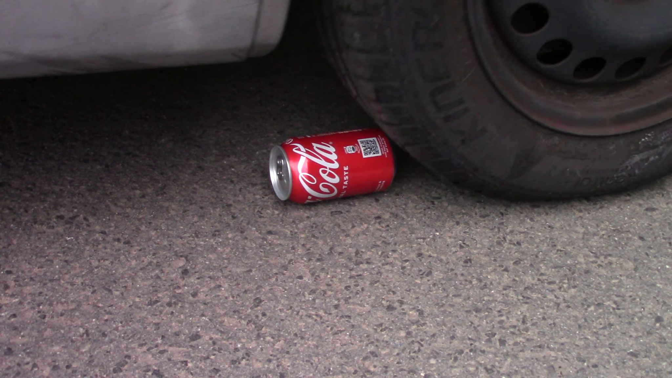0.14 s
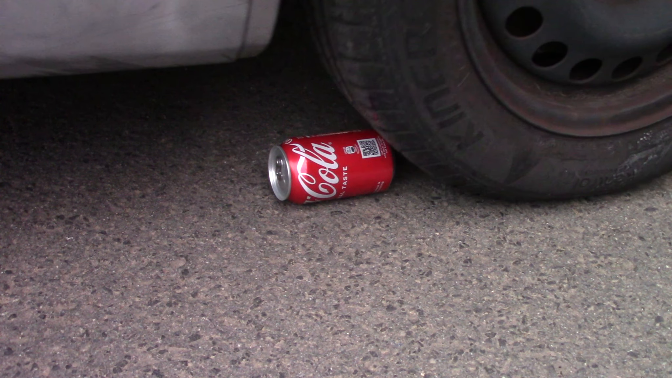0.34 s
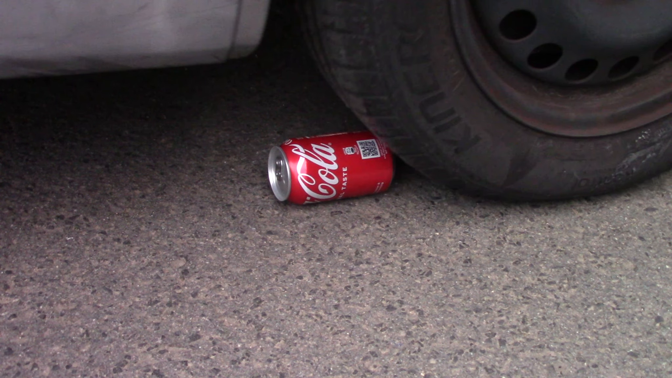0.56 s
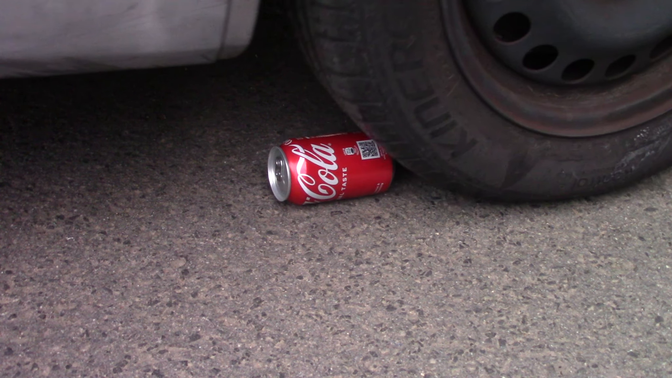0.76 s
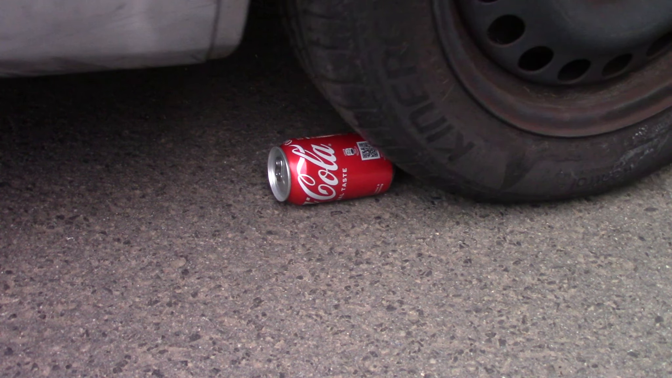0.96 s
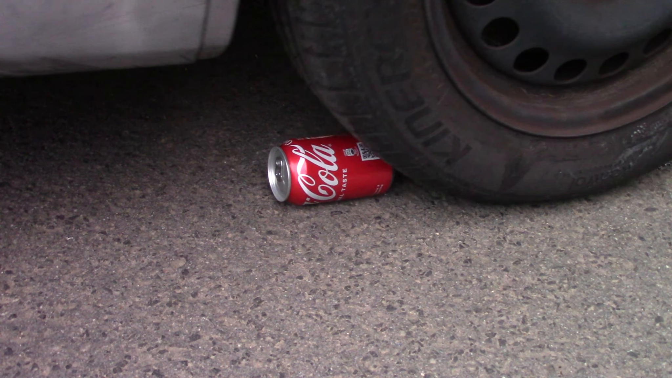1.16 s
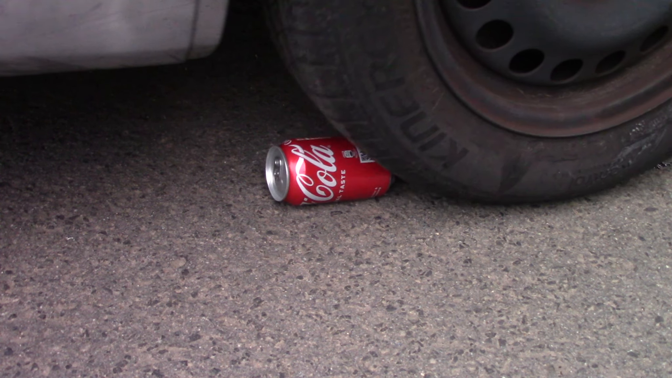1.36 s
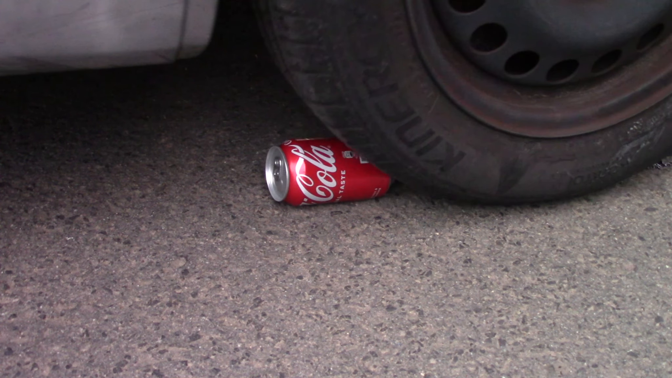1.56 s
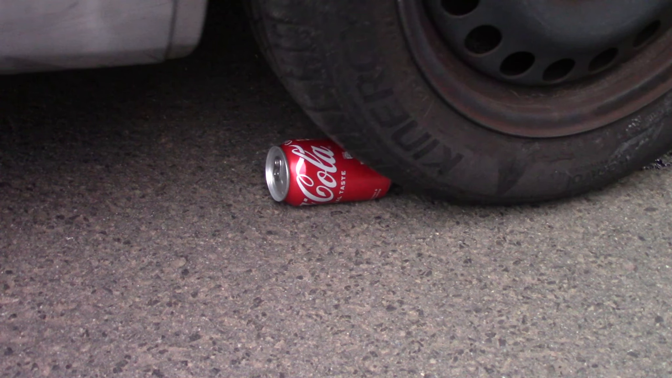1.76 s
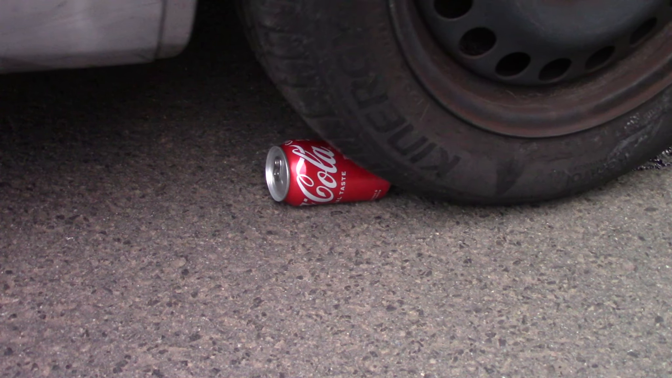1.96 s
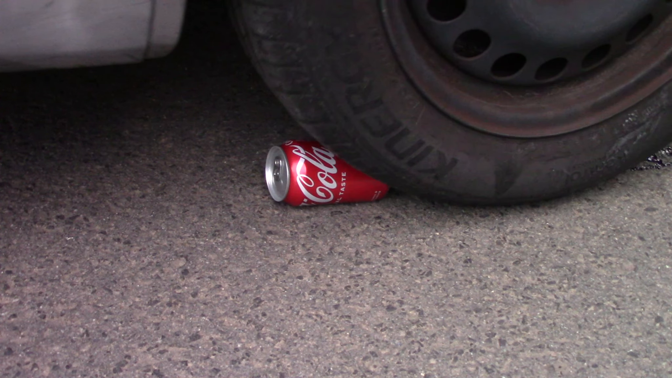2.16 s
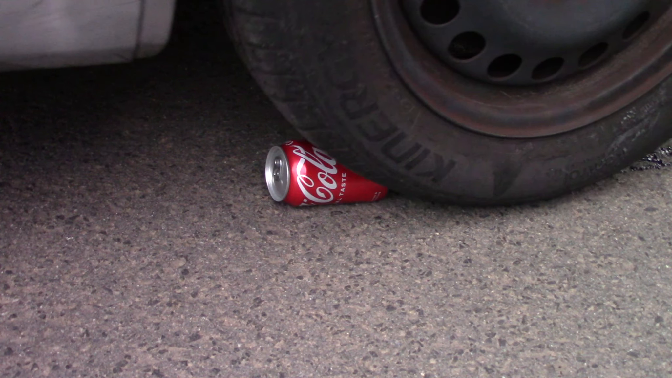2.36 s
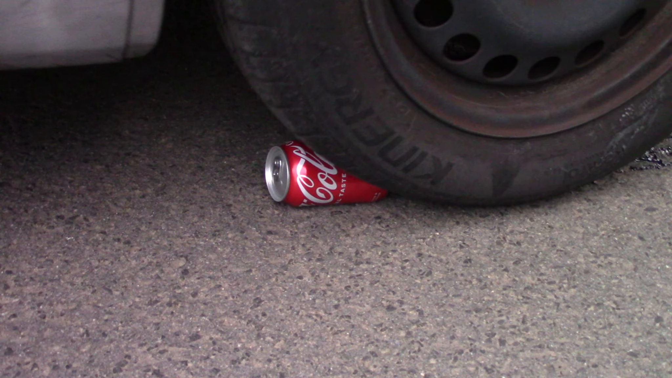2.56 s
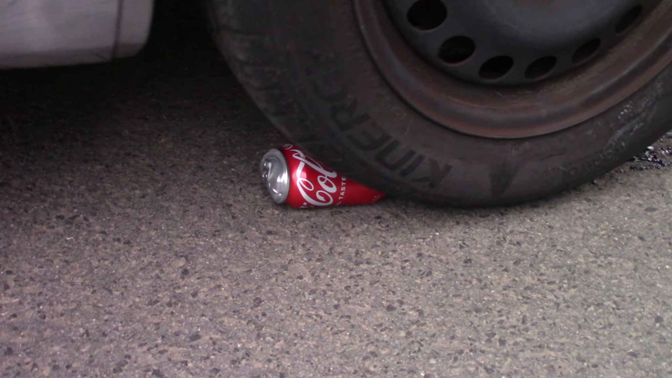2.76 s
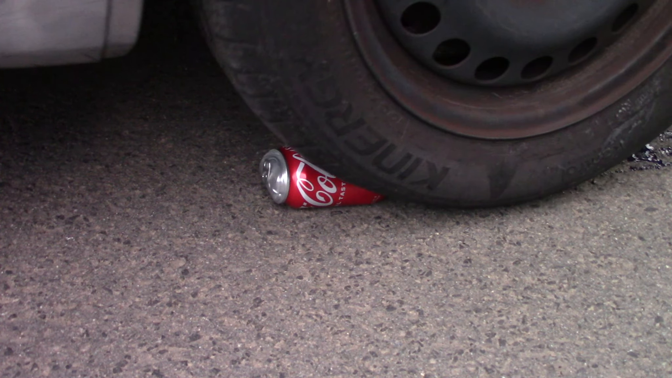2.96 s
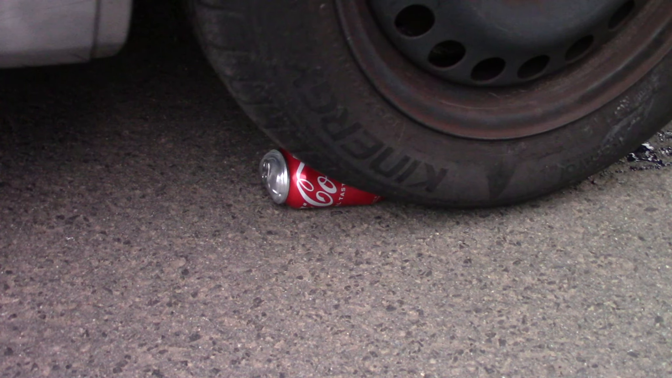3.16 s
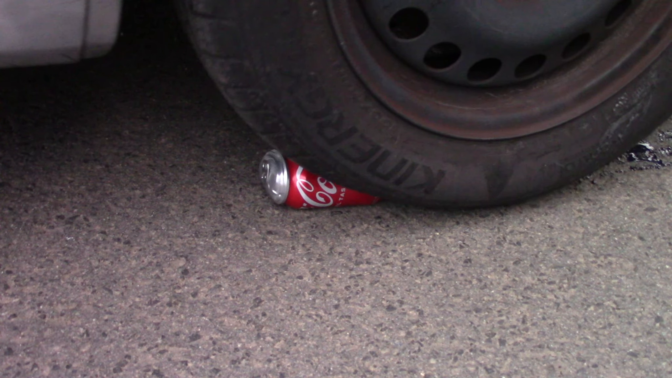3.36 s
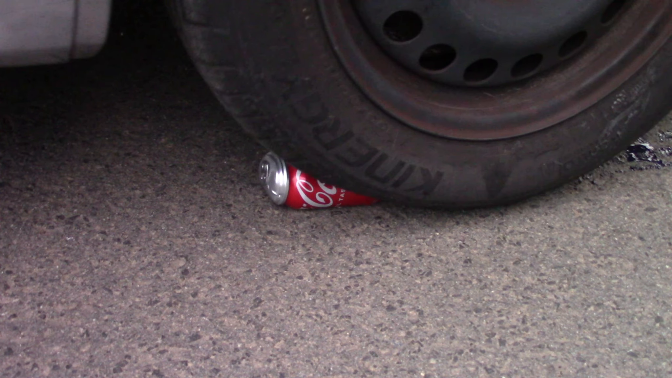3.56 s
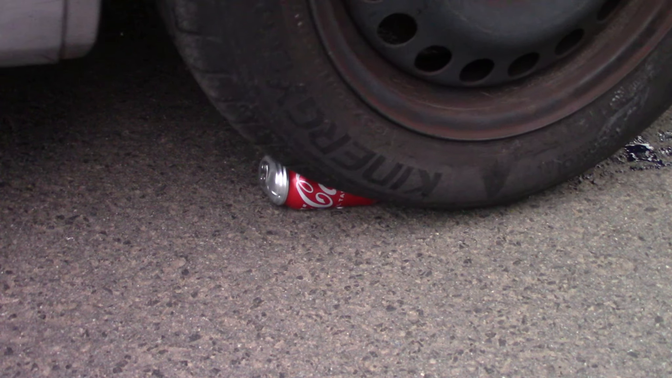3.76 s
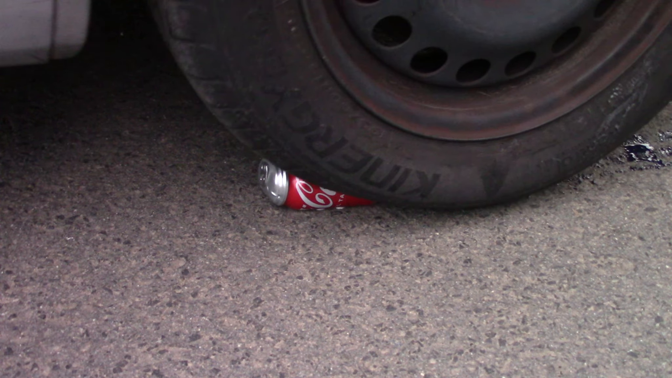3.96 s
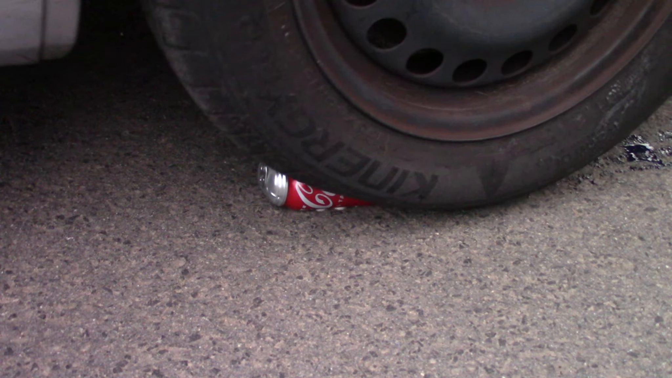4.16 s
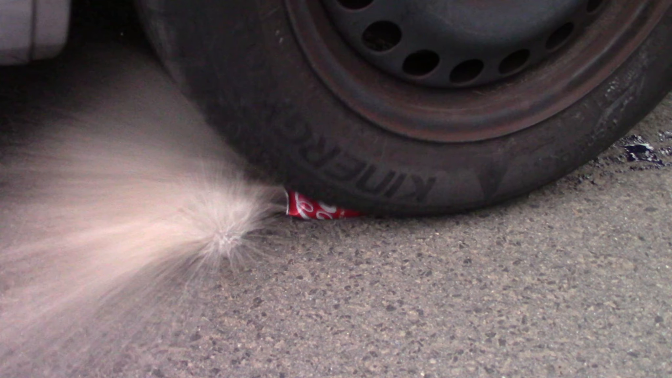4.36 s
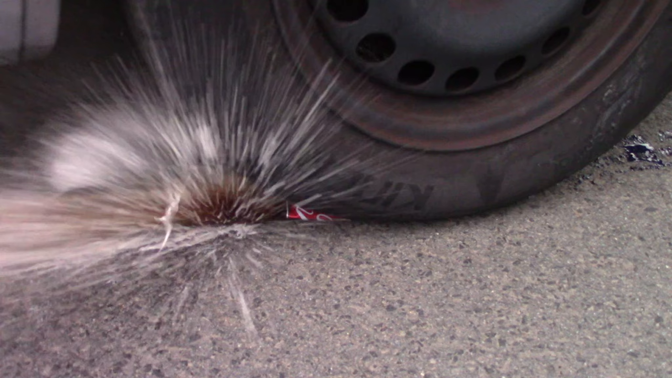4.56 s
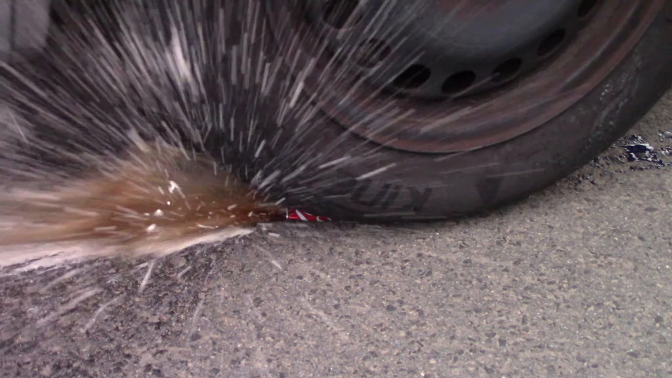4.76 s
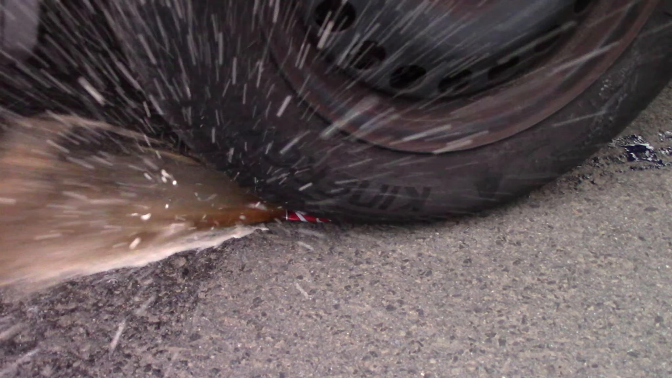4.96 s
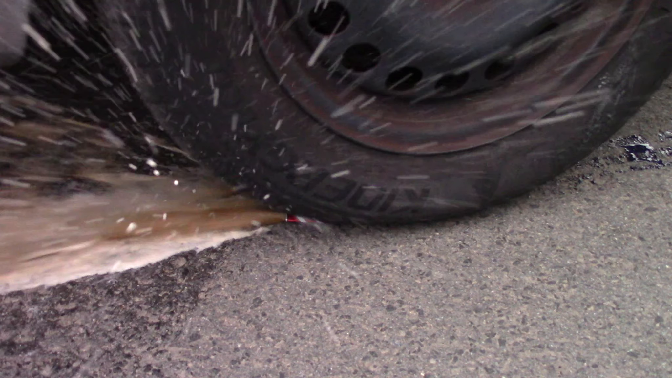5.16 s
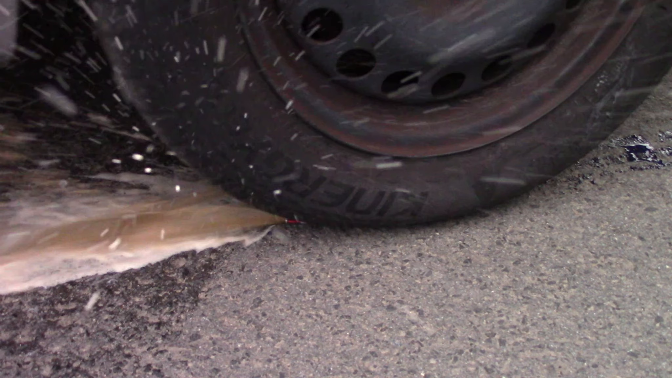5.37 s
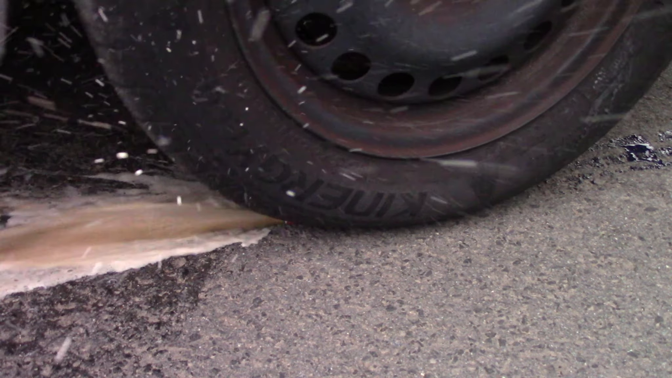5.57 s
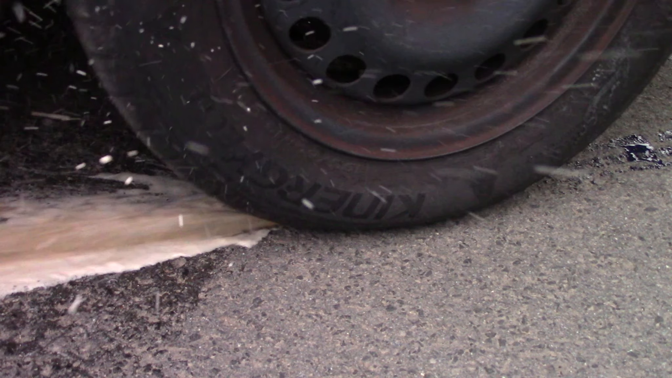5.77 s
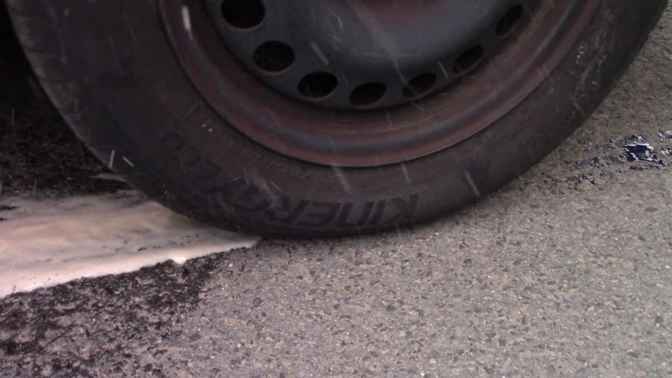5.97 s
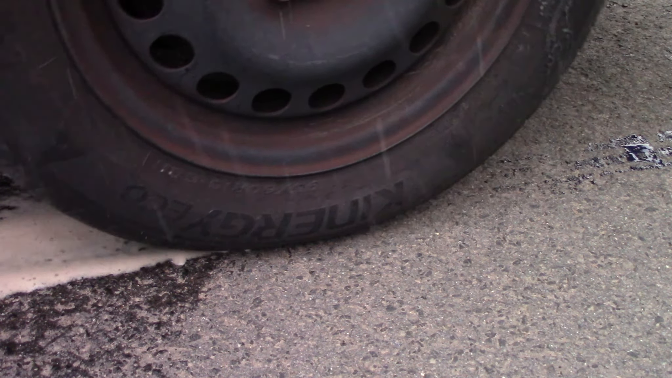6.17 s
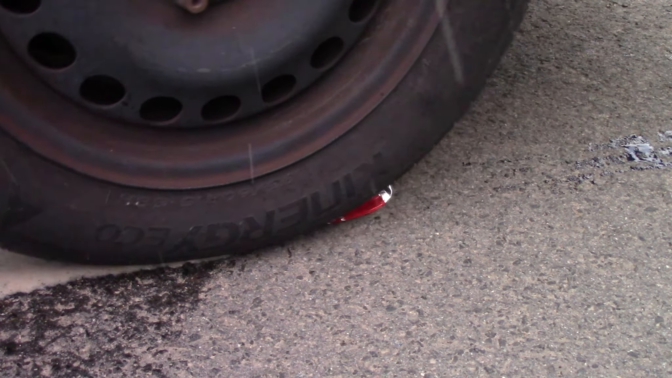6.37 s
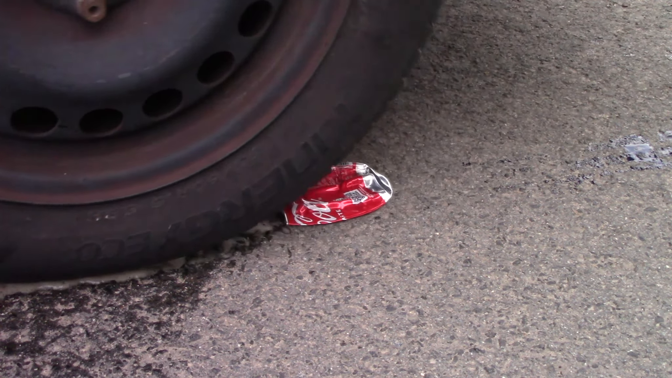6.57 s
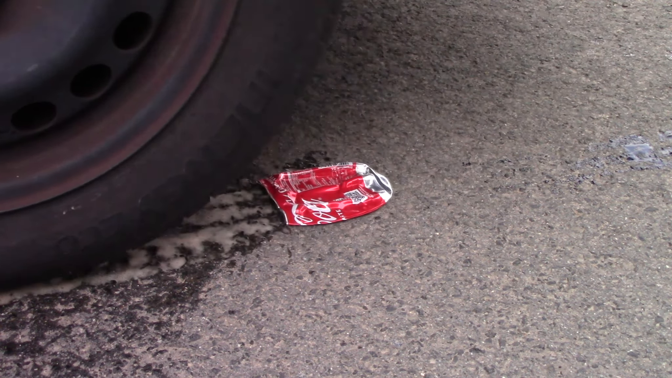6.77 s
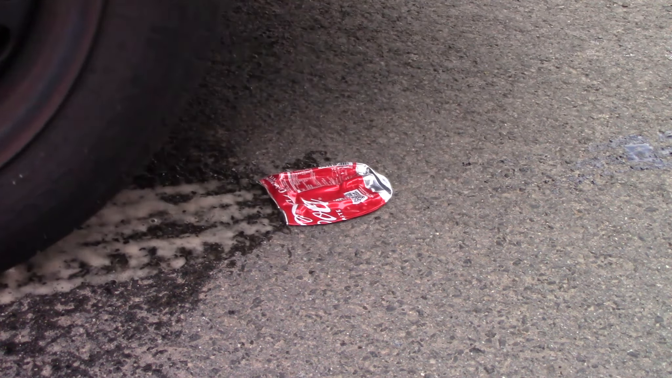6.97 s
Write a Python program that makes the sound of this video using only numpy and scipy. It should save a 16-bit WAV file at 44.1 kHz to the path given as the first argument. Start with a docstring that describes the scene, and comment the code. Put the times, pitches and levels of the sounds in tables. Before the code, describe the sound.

Dull slow-motion can crushing with booming cracks and a thick roaring liquid burst, switching abruptly to crisp real-speed tinny ticks, soft fizz and droplets.

```python
"""On asphalt, a car tyre rolls over a full drink can: the shell cracks and thuds, bursts, and foam gushes out.
Playback is first eight times slowed (deep, dull, no treble), then at true speed for the last metal ticks,
fizz and drips. Cracks are noise bands with ringing modes and thuds are damped swings;
the gush and foam are filtered noise, with bubbles in the gush; drips are rising damped sines."""
import sys
import numpy as np
from scipy.fft import rfft, irfft, next_fast_len
from scipy.io import wavfile
from scipy.ndimage import map_coordinates

SR = 44100
rng = np.random.default_rng(int(sys.argv[2]) if len(sys.argv) > 2 else 0)


def generate_wav(signal):
    """Clip the signal to [-1, 1] and save it as 16-bit WAV at the path in sys.argv[1]."""
    frames = np.transpose(np.atleast_2d(signal))
    scaled = np.clip(frames, -1, 1) * 32767
    pcm = np.round(scaled).astype(np.int16)
    wavfile.write(sys.argv[1], SR, pcm)


N = 309582
SLOW, SWITCH_S = 1 / 8, 5.914  # playback speed before the switch, and the moment of the switch


def amp(db):
    """The decibel law: level in dB to amplitude ratio."""
    return 10 ** (np.asarray(db) / 20)


def unit(x):
    """Normalisation to equal power: rms 1."""
    return x / np.sqrt(np.mean(x ** 2) + 1e-20)


def curves(rows):
    """Linear interpolation: one value per sample for each column after the time."""
    s, *columns = np.transpose(rows)
    return [np.interp(np.arange(N) / SR, s, column) for column in columns]


def wobble(rate):
    """Band-limited fluctuation: a smooth random curve with rate knots per second."""
    knots = rng.standard_normal(int(N * rate / SR) + 4)
    return map_coordinates(knots, [np.arange(N) * rate / SR])


def coloured(x, points, speed=1):
    """Spectral shaping by (Hz, dB) points on a log axis, to rms 1; slower playback lowers every frequency."""
    hz_points, db_points = np.transpose(points)
    true_hz = np.fft.rfftfreq(len(x), 1 / SR) / speed
    gain_db = np.interp(np.log(true_hz + 1), np.log(hz_points), db_points, -120, -120)
    return unit(irfft(rfft(x) * amp(gain_db), len(x)))


def below(x, top_hz):
    """Low-pass filtering with a steep smooth edge just under top_hz."""
    m = next_fast_len(N + SR // 2)
    edge = np.clip((top_hz - np.fft.rfftfreq(m, 1 / SR)) / (top_hz / 30), 0, 1)
    return irfft(rfft(x, m) * np.sin(edge * np.pi / 2) ** 2, m)[..., :N]


def speed_at(s):
    """Time scaling: playback speed at a moment."""
    return SLOW if s < SWITCH_S else 1


def same_speed(s, t):
    """Gating: a slowed sound stops where the playback jumps to true speed."""
    return (s + t < SWITCH_S) == (s < SWITCH_S)


# steady pressure of the tyre, then the gush: time_s [s], rumble_db, gurgle_db, hiss_db [dB]
PRESSURE = [(0.3, -42.5, -48, -45.5), (0.72, -58, -50, -49.5), (1.3, -32.5, -32, -39.5),
            (1.7, -38, -47.5, -48), (2.2, -45, -43.5, -52), (2.5, -34.5, -31.5, -46),
            (2.9, -33, -31.5, -42), (3.2, -38, -39.5, -45), (3.84, -40.5, -45.5, -49.5),
            (4.06, -23.5, -28, -32.5), (4.19, -21.5, -19.5, -21.5), (4.32, -22, -21.5, -26),
            (4.76, -25, -19, -23), (4.9, -31.5, -16.5, -22.5), (5.19, -31.5, -17, -26),
            (5.39, -25.5, -15.5, -26.5), (5.62, -33.5, -18, -22.5), (5.92, -39.5, -25, -30.5)]
# the shell grinds on after it gives way: start_s [s], rumble_db, gurgle_db, hiss_db [dB],
# fall_db_per_s [dB/s, times the band's fall factor]
GRINDS = [(0.0, -56, -44.5, -38, 30), (0.15, -38, -49.5, -45, 70), (0.72, -62, -47.5, -38, 70),
          (0.941, -15, -14.5, -17, 53.5), (1.77, -33, -19.5, -38, 79), (2.04, -48, -40, -31.5, 70),
          (2.26, -24, -19, -34, 69.5), (3.13, -29.5, -20, -39.5, 60), (3.34, -20.5, -28, -28, 60),
          (3.86, -17.5, -19, -26.5, 70)]
# fall factors of rumble, gurgle, hiss [ratio]: the brighter dies sooner
FALL_FACTORS = [0.97, 1.1, 1.17]
GRIND_RISE_S = 0.035


def grinding():
    """Addition of powers: each grind swells briefly and decays exponentially over the steady part."""
    power = amp(curves(PRESSURE)) ** 2
    for s, *levels_db, fall_db in GRINDS:
        t = np.maximum(np.arange(N) / SR - s, 0)
        decay_db = np.array(levels_db)[:, None] - np.outer(FALL_FACTORS, fall_db * t)
        power = power + (amp(decay_db) * np.tanh(t / GRIND_RISE_S)) ** 2
    return np.sqrt(power)


def bubbles(count, hz, spread, cycles, size_db):
    """Bubble resonance: damped sines at random moments, rising in pitch as each bubble nears the surface."""
    draw = rng.random((count, 2))
    pitch = hz * np.exp(spread * rng.standard_normal(count))[:, None]
    t = np.arange(int(3 * cycles / hz * SR)) / SR
    life = t * pitch / cycles
    grain = np.sin(2 * np.pi * pitch * t * (1 + 0.11 * life)) * life * np.exp(-3 * life)
    grain *= amp(-size_db * np.log(draw[:, 1:]))  # random sizes
    where = (draw[:, :1] * N).astype(int) + np.arange(len(t))
    return unit(np.bincount(where.ravel(), grain.ravel(), minlength=N)[:N])


# spectra of the slowed gush, as played back: freq_hz [Hz], density_db [relative dB per Hz]
RUMBLE = [(12, -51), (20, -15.5), (32, -6.5), (110, -2), (140, -34), (240, -120)]
GURGLE = [(65, -35), (110, -0.5), (254, -2), (355, -3), (500, -2), (650, -39.5), (1100, -120)]
HISS = [(290, -15), (500, -4), (642, -4.5), (700, -6.5), (802, -4.5), (1010, -10), (1620, -23), (1820, -30),
        (1950, -41.5), (2540, -70), (4290, -120)]


def gush():
    """Turbulent noise of liquid and metal: rumble, bubbling and grainy hiss under a common surge."""
    rumble_gain, gurgle_gain, hiss_gain = grinding()
    surge_db = 0.3 * wobble(6.6)
    rumble = coloured(rng.standard_normal(N), RUMBLE) * amp(1.2 * wobble(2.9))
    churn = rng.standard_normal(N) * amp(0.63 * wobble(49))
    bubbling = bubbles(count=1500, hz=217.3, spread=0.39, cycles=1.3, size_db=1.0)
    gurgle = coloured(churn + 0.5 * bubbling, GURGLE)
    hiss = coloured(rng.standard_normal(N) * amp(1.62 * wobble(70)), HISS)
    return amp(surge_db) * (rumble_gain * rumble + gurgle_gain * gurgle + hiss_gain * hiss)


# mean levels at true speed: time_s [s], fizz_db, trickle_db [dB]
FOAM = [(5.91, -22.5, -50), (5.978, -33.5, -56), (6.178, -37, -58), (6.386, -39, -53), (6.638, -40, -46.5),
        (6.808, -40, -45), (6.93, -45.5, -52), (7.02, -43.5, -64)]
# spectra at true speed: freq_hz [Hz], density_db [relative dB per Hz]
FIZZ = [(350, -55), (600, -6.5), (1050, -7.5), (1140, -5), (1240, -4), (1430, -5.5), (2680, -4),
        (3890, -9.5), (5050, -9), (8990, -11), (13800, -22.5), (16000, -24)]
TRICKLE = [(35, -81), (60, -53), (161, -2), (337, -7), (406, -9.5), (479, -11), (700, -25), (910, -58.5),
           (1540, -120)]


def foam():
    """Superposed bursts as modulated noise: a fine flickering fizz over a low unsteady trickle."""
    fizz_db, trickle_db = curves(FOAM)
    grains = rng.standard_normal(N) * amp(1.2 * wobble(700))
    fizz = coloured(grains, FIZZ) * amp(fizz_db + 0.65 * wobble(30))
    trickle = coloured(rng.standard_normal(N), TRICKLE) * amp(trickle_db + 4.7 * wobble(44))
    return fizz + trickle


# drips at true speed, in no order of time: start_s [s], level_db [dB], pitch_hz [Hz, at the start]
DRIPS = [(6.231, -25, 246), (6.31, -27.5, 261), (6.419, -17, 503), (6.487, -15.5, 590), (6.673, -27.5, 234),
         (6.709, -31, 324), (6.724, -23, 303), (6.736, -20.5, 344), (6.75, -17.5, 350), (6.791, -32, 199),
         (6.815, -38, 272), (6.916, -32, 205), (6.04, -25.5, 480), (6.135, -23, 520), (6.165, -25, 600),
         (6.185, -27, 560)]
DRIP_SWINGS = 6.8  # a drip dies by 60 dB in this many periods of its starting pitch


def drips():
    """Damped oscillation: each drip is a decaying sine that rises in pitch."""
    out, t = np.zeros(N + SR), np.arange(SR // 10) / SR
    for s, db, hz in DRIPS:
        tone = np.sin(2 * np.pi * hz * t * (1 + 4 * t)) * (1 - np.exp(-t / 0.00072))
        out[round(s * SR):][:len(t)] += amp(db - 60 * t * hz / DRIP_SWINGS) * tone
    return out[:N]


# the can wall gives way or a slug of liquid spurts: start_s [s], level_db [dB],
# pitch_hz [Hz, as played back], fall_db [dB per swing, sign ignored]
THUDS = [(0.162, -26.5, 46.5, -11), (0.845, 2, 48, -3.5), (0.898, -9.5, 95.5, -1), (1.758, 3, 136, -8.5),
         (1.784, -5, 88.8, -6), (2.211, 3.5, 75.3, -4.5), (2.254, 0, 113, -2), (2.628, -22.5, 121, -1.5),
         (3.093, 6, 96.2, -5.5), (3.321, 0.5, 89.5, -5.5), (3.339, -4, 68.7, -5), (3.821, -11.5, 120.4, -7),
         (3.844, 8, 128.3, -4.5), (3.859, 8, 85.2, -4.5), (3.879, 5.5, 77, -10), (3.909, -0.5, 264, -4),
         (3.95, -10.5, 56.8, -3), (3.979, -4, 84.2, -5.5), (4.048, -16.5, 99.6, -3), (4.109, -9.5, 102, -4),
         (4.378, -6, 124.8, -4.5), (4.739, -3, 142, -5), (4.8, -6.5, 135, -4.5), (4.841, 3, 191.3, -5.5),
         (4.861, 3.5, 190, -8.5), (4.964, -4, 124.6, -4.5), (4.995, -5, 133.4, -3),
         (5.026, -7, 146.4, -6.5), (5.084, 4, 204, -5), (5.222, -8, 95, -2), (5.243, -9, 138.4, -1.5),
         (5.269, -1, 174, -5.5), (5.409, -9, 172, -3.5), (5.469, -5, 253, -2), (5.539, 1.5, 200, -8.5),
         (5.619, -7.5, 285, -1.5), (5.689, -7, 253, -2), (5.749, -11, 286, -1.5), (5.848, 3, 225, -4.5),
         (5.963, -8, 1035, -4.5), (5.984, -13, 923, -11), (6.103, -30.5, 1097, 0.5),
         (6.116, -16, 1082, -1.5), (6.127, -18, 1110, -2), (6.337, -15, 1670, -3.5),
         (6.362, -14.5, 1050, -8), (6.383, -16, 1430, -2), (6.452, -13.5, 1270, -6.5),
         (6.632, -17.5, 1510, -17), (6.775, -23, 1080, -5), (6.872, -21, 1660, -4)]
# spectrum of the hollow can: freq_hz [Hz at true speed], level_db [relative dB]
HOLLOW = [(200, -28), (400, -5), (800, -0.5), (1500, -2.5), (2000, -28)]


def thuds():
    """Damped oscillation: a swing builds quickly and dies away, with filtered noise of the hollow can behind."""
    out = np.zeros(N + SR)
    for s, db, hz, fall_db in THUDS:
        speed = speed_at(s)
        t = np.arange(next_fast_len(int(0.06 / speed * SR))) / SR
        swings = t * hz
        fade = (1 - np.exp(-(swings / 0.55) ** 2)) * amp(-abs(fall_db) * swings)
        swing = -np.sin(2 * np.pi * swings) * fade
        hollow = coloured(rng.standard_normal(len(t)), HOLLOW, speed)
        hollow *= amp(-12.5 - 1.7 * swings) * np.tanh(swings)
        out[round(s * SR):][:len(t)] += amp(db) * (swing + hollow) * same_speed(s, t)
    return out[:N]


def split_mode(hz, t):
    """Mode splitting: a dented shell has two close frequencies per mode, which beat."""
    partner_hz = hz * rng.normal(1, 0.019)
    return np.sin(2 * np.pi * hz * t) + 0.46 * np.sin(2 * np.pi * partner_hz * t)


# cracks of the buckling shell: start_s [s], level_db [dB], front_db, knock_db [dB over level],
# knock_hz [Hz as played back], ring_db [dB over level], ring_hz [Hz as played back],
# fall_db [dB per true ms for the noise bands; the modes fall 1.14 times as fast]
CRACKS = [(0.159, -22, -13, -18.5, 447, -3, 804, 7), (0.293, -10.5, -7, -18.5, 528, -9, 942, 1.5),
          (0.616, -44.5, -5, 6.5, 524, -3, 653, 6.5), (0.721, -24.5, -8, -17.5, 282, -6, 974, 2),
          (0.747, -22.5, -8, -11.5, 286, -8, 913, 1), (0.858, -6.5, -3, -4.5, 408.7, -12, 828, 1),
          (1.182, -31.5, 2, 3.5, 393, -10.5, 713, 0.5), (1.292, -31, -8, 7.5, 355, -12.5, 854, 2),
          (1.396, -15.5, -4, -13.5, 290, -8.5, 850, 12.5), (1.421, -29.5, -5, -16, 276, -5, 1066, 2.5),
          (1.514, -24, -2, -0.5, 500, -6, 856, 11.5), (1.592, -27.5, -3, -3.5, 419, -11, 1026, 1),
          (1.618, -23, -1.5, -3.5, 413, -6.5, 773, 3.5), (1.76, -21, -9, 9.5, 384, -10, 825, 3),
          (1.82, -12.5, -12, -6.5, 276, -8, 919, 3.5), (1.856, -19, -3.5, -12.5, 420, -15, 904, 2),
          (1.941, -26, -5, -11, 510, -8, 744, 0.5), (2.03, -9.5, -1, -4, 513, -8, 618, 5.5),
          (2.043, -10.5, 2.5, -11, 446, -7, 716, 16), (2.057, -20, -3, -8.5, 487, -10, 821, 5),
          (2.221, -0.5, 0, -4, 473.5, -8, 886, 4), (2.245, -16, -5, 1.5, 365, -9, 843, 4.5),
          (2.639, -36.5, -3, 9, 409, -13, 960, 2.5), (2.777, -34.5, -7, 2, 314, -10, 925, 3),
          (3.011, -34.5, -4, -2, 393, -7, 646, 2.5), (3.099, -19, -1, 3, 286.4, -11, 956, 1.5),
          (3.223, -28, -7.5, -2, 284, -8, 940, 5), (3.325, -24, -6.5, 5, 303, -10, 807, 1.5),
          (3.35, -23.5, -14, -8.5, 520, -4, 798, 0.38), (3.587, -15.5, -15.5, -8, 496, -4, 939, 4.5),
          (3.751, -33, -6, -12.5, 374, -7, 870, 2), (3.834, -11, -6, -7.5, 505, -7, 880, 2.5),
          (3.848, -4, -2.5, -2.5, 269, -5.5, 1044, 3.5), (3.866, -7.5, -4, -0.5, 535, -6.5, 709, 4),
          (3.89, -2, 1.5, 0, 655, -5.5, 692, 10), (3.904, -17, -7, 7.5, 275, -9, 815, 10),
          (4.133, -13, -6, -5.5, 271, -11, 720, 2.5), (4.191, -15, -14, 2.5, 557, -10.5, 886, 5),
          (4.375, -9.5, -5, -3.5, 321.6, -10.5, 872, 2), (4.747, -19.5, 0, -1, 528, -5, 710, 3),
          (4.866, -16.5, -4.5, -10, 285, -7, 915, 1.5), (5.004, -13, -3.5, 2, 477, -9, 815, 8),
          (5.087, -4, -9.5, -2.5, 299.3, -3.5, 782, 5.5), (5.109, -9, -6.5, -15.5, 640, -4.5, 644, 1.5),
          (5.271, -29, -4, 8, 292, -7.5, 840, 3.5), (5.41, -18, -1.5, 0.5, 444.5, -11, 748, 0.5),
          (5.533, -19.5, 1, 8.5, 313, -7, 655, 2.5), (5.719, -12.5, -7.5, 1, 293, -5.5, 747, 4.5),
          (5.849, -8.5, -21.5, 1.5, 353, -4.5, 750, 9.5), (5.9174, -14.5, -3, -7, 2410, -2, 9000, 6),
          (5.9524, -24, -11, -3, 2140, -12, 6800, 9), (5.9641, 1.5, -9, -5.5, 4740, -8.5, 5230, 5),
          (6.0057, -17.5, -4, -0.5, 2130, -5, 9000, 12), (6.0332, -16.5, -14, -1, 2370, -14, 7860, 1),
          (6.0838, -10.5, -9.5, -6.5, 4770, 4, 5250, 11), (6.0896, -6.5, -16, -14, 3070, 5, 7070, 2),
          (6.1159, -10.5, -29, -6, 2130, -3, 7070, 1.5), (6.2756, -4, 0, -4.5, 2940, -10, 7400, 6),
          (6.338, -30, -5, 5, 2130, -10, 7000, 4), (6.352, -20.5, -2, -9, 2860, -14, 7200, 2.5),
          (6.3622, -18.5, -18, -3, 3030, -11, 7160, 1), (6.3832, -21.5, -9, 1, 2860, -11, 6800, 6),
          (6.4537, -13.5, -20, -4.5, 2740, -2.5, 6500, 1.5),
          (6.6339, -12.5, -0.5, -6.5, 3100, -6.5, 7340, 3.5), (6.6862, -17.5, 2, -10.5, 3030, -12, 7400, 1),
          (6.776, -19, 0, 0.5, 3480, -5, 7400, 3.5), (6.823, -25.5, -7, -13, 2960, -7, 7060, 1.5),
          (6.871, -21.5, -8, 2, 2600, -2.5, 6540, 3.5), (6.9678, -26, 9, -1, 3720, -13, 5300, 1)]
# noise spectra of a crack: freq_hz [Hz at true speed], level_db [relative dB]
SNAP = [(4000, -28.5), (4900, -5), (7000, 4.5), (8500, -3), (10000, -9.5), (11500, -27.5)]
SHELL = [(1200, -30.5), (1700, 2), (2800, 0), (4500, -1.5), (5500, -36.5)]
TINKLE = [(9000, -26), (10500, 4.5), (13000, -1.5), (16500, -10)]
# round can and flat can: mean top mode [true Hz], base tinkle level [dB], echo [dB over the crack's level]
ROUND, FLAT = (10500, -24, -11), (12400, -22, -11)
SNAP_DB = -11.5  # broad noise of every crack, over its level
TINKLE_SCATTER = 0.04  # relative spread of the top mode's pitch
TINKLE_OVER_PEAK = -0.26  # dB of tinkle per dB of level: louder cracks have relatively less tinkle
TINKLE_OVER_KNOCK = -0.3  # dB of tinkle per dB of knock: dull cracks tinkle less
FLAT_BRIGHTENS_DB_PER_S = 7  # the flat can's ticks gain tinkle with time


def cracks():
    """Modal excitation: a sharp front, three shell noise bands and ringing modes; the car's underside echoes."""
    out = np.zeros(N + SR)
    band_ratio = 1.06  # half-width of the wavering band around the ring
    for s, db, front_db, knock_db, knock_hz, ring_db, ring_hz, fall_db in CRACKS:
        speed = speed_at(s)
        top_hz, tinkle_db, echo_db = ROUND if s < SWITCH_S else FLAT
        t = np.arange(next_fast_len(int(0.12 / speed * SR))) / SR
        ms = t * speed * 1000  # true milliseconds
        snap_noise, shell_noise, tinkle_noise, hum_noise = rng.standard_normal((4, len(t)))
        rise = 1 - np.exp(-ms / 0.13)
        echo = amp(echo_db - 0.69 * ms)  # a slower tail of the same noise
        fade = rise * (amp(-abs(fall_db) * ms) + echo)
        mode_fade = rise * amp(-abs(fall_db) * 1.14 * ms)

        front_hz = np.sqrt(knock_hz * ring_hz)
        front = amp(front_db - 18 * ms) * np.sin(2 * np.pi * front_hz * t)
        snap = amp(SNAP_DB) * coloured(snap_noise, SNAP, speed) * fade

        # the ring wavers on after the blow
        hum_band = [(ring_hz / band_ratio, -25), (ring_hz, 0), (ring_hz * band_ratio, -25)]
        hum = amp(-25 - 0.39 * ms) * rise * coloured(hum_noise, hum_band)
        ring = amp(ring_db) * (split_mode(ring_hz, t) * mode_fade + hum)

        shell = 0.61 * coloured(shell_noise, SHELL, speed) * fade
        knock = amp(knock_db) * (shell + 0.75 * split_mode(knock_hz, t) * mode_fade)

        tinkle_hz = top_hz * speed * rng.normal(1, TINKLE_SCATTER)
        tinkle_db += TINKLE_OVER_PEAK * db + TINKLE_OVER_KNOCK * knock_db
        tinkle_db += FLAT_BRIGHTENS_DB_PER_S * max(s - SWITCH_S, 0)
        glitter = 0.42 * coloured(tinkle_noise, TINKLE, speed) * fade
        tinkle = amp(tinkle_db) * (glitter + split_mode(tinkle_hz, t) * mode_fade)

        crack = front + snap + ring + knock + tinkle
        out[round(s * SR):][:len(t)] += amp(db) * crack * same_speed(s, t)
    return out[:N]


def scene():
    """Superposition: cracks and thuds throughout; the gush while slowed, foam and drips after."""
    slowed = np.arange(N) < SWITCH_S * SR
    liquid = np.where(slowed, gush(), foam() + drips())
    return (liquid + thuds() + cracks())[None]


SLOW_TOP_HZ, TOP_HZ = 1930, 16600  # upper band limits: slowed part, whole output
BASS_HZ = 76  # lower band limit of the true-speed part


def record(dry):
    """Saturation and band limiting: soft limit, a band for each speed, flat clipping, faint converter hiss."""
    slowed = np.arange(N) < SWITCH_S * SR
    saturated = dry / (1 + np.abs(dry / 1.02) ** 6) ** (1 / 6)
    bass_cut = saturated - below(saturated * ~slowed, BASS_HZ)
    x = np.where(slowed, below(saturated * slowed, SLOW_TOP_HZ), bass_cut)
    x = np.clip(x, -1, 1) + amp(-96) * rng.standard_normal(N)
    return below(x, TOP_HZ)


dry = scene()
out = record(dry)
generate_wav(out)
```